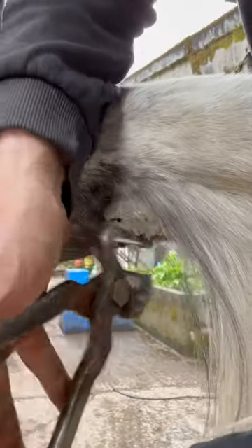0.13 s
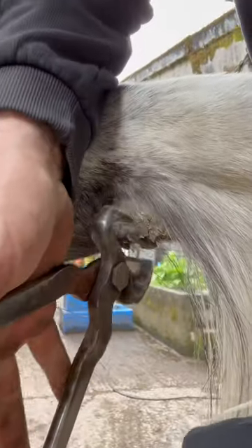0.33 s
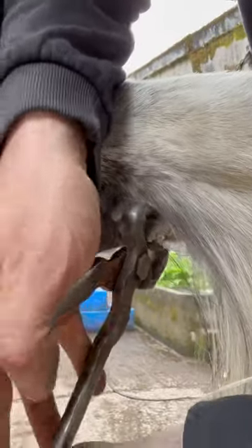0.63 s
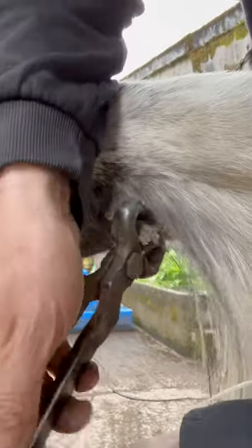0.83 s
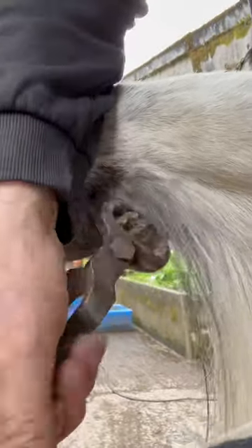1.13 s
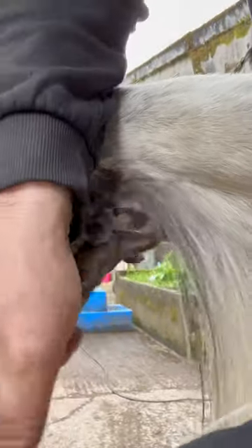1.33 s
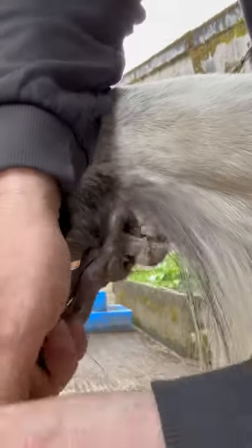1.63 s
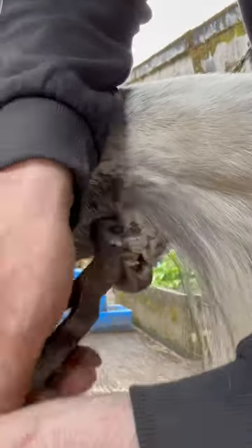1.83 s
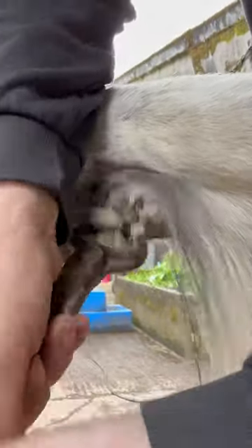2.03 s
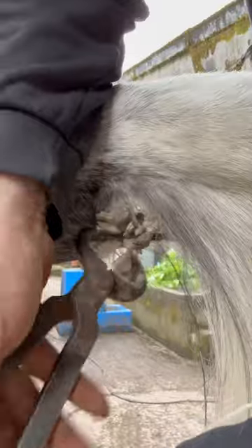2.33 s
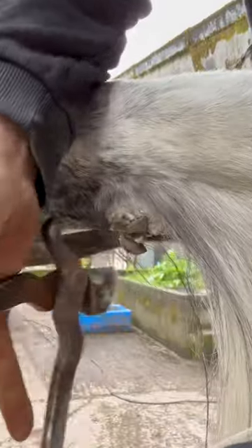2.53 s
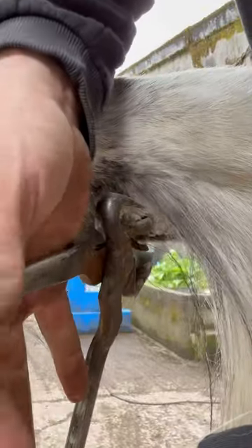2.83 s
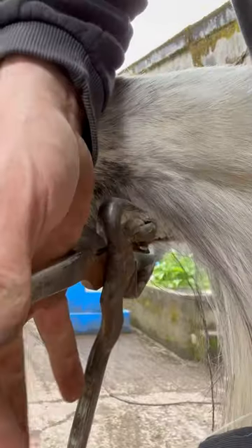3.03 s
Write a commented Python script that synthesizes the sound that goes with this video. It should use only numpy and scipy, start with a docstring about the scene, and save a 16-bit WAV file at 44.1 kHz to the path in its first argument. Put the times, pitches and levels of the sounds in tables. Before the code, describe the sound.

Steel nippers rasp and crunch dry horn very close, already biting at 0 s and fading by 0.2 s. At 0.75 s a harder, ringing burst of cracks ends in a short squeak until 0.85 s. A dull falling tap comes at 1.3 s, light ticks at 1.6-2.25 s, a brittle snap at 2.5 s. Soft handling bumps, strongest near 3.1 s; distant echoing birds, a nearer thin whistle at 2.55-2.95 s, low outdoor rumble and faint hiss.

```python
"""Close to the microphone, steel nippers rasp and crunch through a horny growth on a horse's leg and squeak.
Grains and cracks in noise ring the steel; a dull tap follows as a falling tone, later a sharp snap as brief cracks.
Around the bites the jaws tick as decaying noise, and arms and tool bump as low swells.
Distant birds around the yard are gliding tones with echo, over coloured noise: rumble, drone, air, hiss and rustle."""
import sys
import numpy as np
from scipy import signal
from scipy.fft import rfft, irfft, next_fast_len
from scipy.io import wavfile
from scipy.ndimage import map_coordinates

SR = 44100
rng = np.random.default_rng(int(sys.argv[2]) if len(sys.argv) > 2 else 0)


def dump_mix(stems):
    """Bounce the given channels to the path in sys.argv[1] as a 16-bit WAV at rate SR."""
    frames = np.atleast_2d(stems).T  # one column per channel
    limited = np.clip(frames, -1, 1)  # hard clip at full scale
    pcm = np.round(limited * 32767).astype(np.int16)
    wavfile.write(sys.argv[1], SR, pcm)


N = 140238
BIRD_T60_S = 0.52  # echo decay shared by all the birds that have one


def amp(db):
    """Decibels to gain."""
    return 10 ** (np.asarray(db) / 20)


def unit(x):
    """Scale to rms 1."""
    return x / np.sqrt(np.mean(np.abs(x) ** 2) + 1e-20)


def clock():
    """Time of each sample in seconds."""
    return np.arange(N) / SR


def along(points, hz):
    """Read (Hz, value) points on a log frequency axis."""
    f, v = np.transpose(points)
    return np.interp(np.log(hz + 1), np.log(f + 1), v)


def curves(rows):
    """One value per sample for each column after the time."""
    s, *cols = np.transpose(rows)
    return [np.interp(clock(), s, c) for c in cols]


def wobble(rate):
    """A smooth random curve, rate knots a second."""
    return map_coordinates(rng.standard_normal(8192), [clock() * rate], mode="wrap")


def filtered(x, response):
    """x times a complex response of frequency."""
    m = next_fast_len(N + SR // 4)
    return irfft(rfft(x, m) * response(np.fft.rfftfreq(m, 1 / SR)), m)[..., :N]


def gate(start, length, attack, release):
    """Linear attack, hold and exponential release."""
    t = clock() - start
    return np.clip(t / attack, 0, 1) * np.exp(-np.maximum(t - length, 0) / release)


def sine(hz):
    """A sine that follows a pitch curve."""
    return np.sin(2 * np.pi * np.cumsum(hz) / SR)


def rush(spectrum):
    """Coloured stereo noise of rms 1, its left-right likeness set by frequency."""
    # likeness of left and right: frequency_hz, correlation (0 to 1)
    alike = [(60, 0.98), (220, 1), (380, 0.83), (700, 0), (1300, 0.28), (2400, 0.5), (4400, 0.21),
             (8000, 0), (13000, 0.87)]

    def mid_side(hz):
        turn = np.arccos(np.clip(along(alike, hz), -1, 1)) / 2
        return amp(along(spectrum, hz)) * [np.cos(turn), np.sin(turn)]

    mid, side = filtered(rng.standard_normal((2, N)), mid_side)
    return unit(np.array([mid + side, mid - side]))


def yard(x, t60, width):
    """Diffuse echo of the yard's walls, as decaying stereo noise."""
    t = np.arange(SR) / SR
    mid, side = rng.standard_normal((2, SR)) * amp(-60 * t / t60)
    tail = np.array([mid + width * side, mid - width * side])
    return signal.fftconvolve(x[None], tail / np.linalg.norm(tail[0]), axes=1)[:, :N]


def crunch():
    """Each stroke grinds and cracks through the horn and rings the steel; the blade chatters roughly on one mode."""
    # strokes of the jaws: start_s, length_s, level_db before the body filter,
    # tilt_db_per_octave, chatter_mode_hz, chatter_db
    bites = [(0, .017, -37, -1.5, 4250, -44), (.02, .011, -47, -4, 2310, -56),
             (.036, .016, -54, -5, 2310, -55), (.053, .018, -48.5, -5, 2310, -46),
             (.07, .017, -46, -4, 2310, -52), (.088, .03, -52, -5.5, 2150, -57),
             (.12, .02, -53.5, -4, 2400, -62), (.14, .02, -57, -4, 2400, -64),
             (.16, .03, -62, -3, 2400, -68), (.744, .014, -40, -3, 1290, -45),
             (.757, .006, -36, 0, 1290, -43), (.762, .006, -28.5, 1.5, 5240, -28),
             (.7725, .008, -30, 1, 4090, -35), (.782, .007, -32, -1, 3770, -35),
             (.79, .008, -40, -1, 1530, -50)]
    # ringing of the nippers: frequency_hz, width_hz, relative_level_db
    steel_modes = [(1290, 45, -9), (1510, 50, -9), (2320, 70, -0.5), (2690, 70, -1), (2970, 50, 0),
                   (3170, 45, -3), (3770, 150, -1), (4090, 130, -2), (4780, 170, -2), (5240, 140, 2),
                   (6750, 170, -6), (7380, 70, -6), (8870, 120, -15)]
    # dry crunch of horn: frequency_hz, relative_level_db
    horn = [(500, -34.5), (1100, -27), (2500, 14), (5000, -5), (6100, -7), (7200, -4), (8200, -24),
            (10500, -20), (12500, -21), (15500, -30), (17000, -37.5)]
    # single fractures of the horn: start_s, level_db before the filters
    cracks = [(.0735, -35), (.081, -36), (.745, -30), (.766, -12), (.7768, -12.5), (.7802, -18.5),
              (.7857, -16.5)]
    horn_db, low_hz, high_hz = -14.5, 1000, 12000
    crack_decay_s, crack_low_hz = .0003, 2600
    apart = .12  # share of stereo difference

    def body(f):
        steel = sum(amp(db) * 1j * f * w / (c * c - f * f + 1j * f * w) for c, w, db in steel_modes)
        colour = unit(steel) + amp(horn_db) * unit(amp(along(horn, f)))
        return colour * (1 - np.exp(-(f / low_hz) ** 4)) / (1 + (f / high_hz) ** 4)

    t, rough = clock(), crumbs()
    crack_level = sum((t >= s) * amp(db - 20 * np.abs(t - s) / crack_decay_s / np.log(10)) for s, db in cracks)
    force = rng.standard_normal((2, N)) * crack_level
    force = filtered(force, lambda hz: 1j * hz / (crack_low_hz + 1j * hz))
    chatter = np.zeros(N)
    for start, length, db, tilt, mode_hz, chatter_db in bites:
        stroke = gate(start, length, attack=.003, release=.002) * amp(1.5 * wobble(700))
        grind = filtered(rng.standard_normal((2, N)),
                         lambda hz: amp(tilt * np.log2(np.clip(hz, 1000, 12000) / 4000)))
        force += amp(db) * stroke * rough * grind
        chatter += amp(chatter_db) * stroke * unit(sine(mode_hz * (1 + .012 * wobble(600))))
    mid, side = filtered(force, body)
    return chatter + np.array([mid + apart * side, mid - apart * side])


def crumbs():
    """Roughness of breaking horn: tiny cracks of uneven size over a little steady grinding."""
    per_s, decay_s, spread_db, grind_share = 750, .0005, 4, .2
    sizes = amp(spread_db * np.clip(rng.standard_normal(N), -2, 2))
    hits = (rng.random(N) < per_s / SR) * sizes
    spikes = unit(signal.lfilter([1], [1, -np.exp(-1 / (decay_s * SR))], hits))
    return unit(grind_share + (1 - grind_share) * spikes)


def squeak():
    """The blade sticks and slips at the end of the bite, brightest midway."""
    # pitch and strength of the blade: time_s, pitch_hz, fundamental_rms_db
    blade = [(.78, 2300, -42), (.801, 2335, -34), (.81, 2400, -39), (.821, 2430, -39), (.836, 2370, -35),
             (.843, 2385, -38), (.85, 2420, -56)]
    # harmonics at the brightest moment: multiple, level_db against the fundamental
    overtones = [(2, -3), (3, -8), (4, -22), (5, -25)]
    bright_s, bright_width_s = .818, .016
    t = clock()
    hz, db = curves(blade)
    phase = 2 * np.pi * np.cumsum(hz * (1 + .007 * wobble(550))) / SR
    bright = np.exp(-((t - bright_s) / bright_width_s) ** 2)
    harmonics = sum(amp(level) * np.sin(round(k) * phase) for k, level in overtones)
    sounding = (t > blade[0][0]) * (t < blade[-1][0])
    return np.sqrt(2) * amp(db) * (np.sin(phase) + bright * harmonics) * sounding


def tap():
    """A dull tap whose pitch drops within milliseconds into a softer body."""
    start_s, t60_s, start_db = 1.3083, .05, -30.5
    high_hz, low_hz, fall_s = 1940, 204, 0.00244
    body_db, ring_s = -7, .003  # the body settles this far down, this quickly
    t = np.maximum(clock() - start_s, 0)
    cycles = low_hz * t + (high_hz - low_hz) * fall_s * (1 - np.exp(-t / fall_s))
    db = start_db + body_db * (1 - np.exp(-t / ring_s)) - 60 * t / t60_s
    return filtered(amp(db) * np.sin(2 * np.pi * cycles), lambda hz: 1 / (1 + (hz / 2300) ** 8))


def snap():
    """A brittle chip breaks off in a quick run of cracks, each with a very high, short ring."""
    # cracks of the last chip: start_s, level_db before the noise and ring shares
    chip = [(2.5227, -22), (2.5234, -30), (2.5239, -35)]
    # colour of the cracks: frequency_hz, relative_level_db
    colour = [(400, -11), (2000, -7), (6500, -8), (9500, -10.5), (13000, 4), (15000, -4), (17000, 1)]
    t60_s, ring_hz = .002, 13700
    t = clock()
    level = sum((t >= s) * amp(db - 60 * np.abs(t - s) / t60_s) for s, db in chip)
    return level * (amp(-4) * rush(colour) + amp(-5) * np.sin(2 * np.pi * ring_hz * t))


def ticks():
    """The jaws touch and scuff the horn while they seek a new grip; one short scrape rises before the bite."""
    # light touches, as noise: start_s, starting_rms_db, t60_s
    touches = [(0.704, -65, 0.074), (1.603, -55.5, .05), (1.676, -59, 0.013), (1.932, -55.5, 0.022),
               (2.025, -50, 0.0088), (2.057, -54, 0.02), (2.069, -52, 0.01), (2.241, -55, .03),
               (3.045, -63, 0.064)]
    # colour of the touches: frequency_hz, relative_level_db
    colour = [(1000, -20), (2500, -4), (3700, 9), (5500, 1), (8000, -31.5), (11000, -8), (15500, -15),
              (17000, -32)]
    t = clock()
    scrape = amp(-60) * note(.695, .02, 3000, 3850, .024 * wobble(600))
    return scrape + rush(colour) * sum((t >= s) * amp(db - 60 * np.abs(t - s) / t60) for s, db, t60 in touches)


def bumps():
    """Soft low swells from the moving arms and tool."""
    # handling: centre_s, pitch_hz, peak_db, half_width_s (to 1/e)
    swells = [(.09, 96.9, -36.5, 0.037), (0.168, 203.3, -37.5, 0.032), (.18, 53.1, -41, 0.11),
              (0.604, 60.6, -34, 0.016), (0.898, 222.2, -35, 0.02), (1.21, 92.4, -36.5, 0.013),
              (1.224, 224.8, -39.5, 0.021), (2.598, 62.6, -40, 0.017), (2.809, 66, -38, 0.015),
              (3.097, 68.5, -30, 0.018), (3.148, 69.7, -31.5, 0.0097)]
    t = clock()
    return sum(amp(db) * np.exp(-((t - s) / width) ** 2) * np.sin(2 * np.pi * (hz * t + rng.random()))
               for s, hz, db, width in swells)


def note(start, length, from_hz, to_hz, waver, ratio=1):
    """One gliding, wavering tone with a quick attack and release."""
    hz = ratio * np.interp(clock(), [start, start + length], [from_hz, to_hz]) * (1 + waver)
    return gate(start, length, attack=0.0036, release=0.011) * sine(hz)


def thin_whistle():
    """A nearer, thin whistle drops, then holds in pulses, with little echo."""
    # the whistle: time_s, pitch_hz, level_db before flutter and trim
    call = [(2.545, 2720, -75), (2.558, 2620, -56), (2.566, 2410, -49), (2.59, 2320, -57),
            (2.63, 2280, -48), (2.658, 2255, -59), (2.668, 2250, -50), (2.685, 2245, -68),
            (2.71, 2230, -66), (2.722, 2222, -50), (2.758, 2222, -49), (2.785, 2230, -68),
            (2.815, 2255, -53), (2.865, 2240, -66), (2.9, 2260, -57), (2.945, 2250, -75)]
    trim_db, flutter_db, echo_db = -.5, 3, -6
    t = clock()
    hz, db = curves(call)
    tone = sine(hz * (1 + .012 * wobble(330)))
    tone = tone * amp(db + trim_db + flutter_db * wobble(110)) * (t > call[0][0]) * (t < call[-1][0])
    return np.sqrt(2) * tone + amp(echo_db) * yard(tone, BIRD_T60_S, width=0.67)


def birds():
    """Far fluttering whistles and raspy two-voiced chirps, heard mostly by their echo, and one high dry peep."""
    # far whistles: start_s, length_s, from_hz, to_hz, level_db before flutter and direct share
    far_whistles = [(0.262, 0.04, 1880, 1806, -65), (0.584, 0.1, 1897, 1808, -57.5),
                    (0.829, 0.032, 2440, 2430, -51.5), (0.955, 0.072, 2420, 2396, -56),
                    (1.091, 0.18, 2394, 2274, -62), (1.101, 0.28, 1930, 1913, -63),
                    (1.251, 0.17, 2297, 2040, -60.5), (1.454, 0.15, 2068, 2186, -63.5),
                    (1.68, 0.027, 1880, 2020, -59), (1.814, 0.066, 2018, 2054, -49),
                    (1.991, 0.088, 2395, 2356, -60), (2.008, 0.28, 2075, 2112, -63.5),
                    (2.11, 0.16, 2406, 2735, -64), (2.279, 0.15, 2860, 2750, -67.5),
                    (2.991, 0.079, 2230, 1843, -62.5), (3.065, 0.057, 2680, 2940, -66.5)]
    # far chirps: start_s, length_s, from_hz, to_hz, level_db before direct share, upper_voice_db against the lower
    far_chirps = [(0.088, 0.1, 4540, 4340, -64, -10), (0.297, 0.06, 4630, 4220, -50.5, -17),
                  (0.373, 0.079, 4323, 4290, -58, -25), (0.504, 0.069, 4776, 4520, -57, -20),
                  (0.648, 0.035, 4540, 4296, -54, -8.5), (1.264, 0.033, 4360, 4267, -54, -6.5),
                  (1.418, 0.092, 4670, 4557, -57, -19.5), (1.635, 0.041, 5000, 4480, -57, -18),
                  (1.692, 0.075, 4340, 4410, -61.5, -3.5), (1.856, 0.094, 4750, 4490, -60, -9.5),
                  (2.175, 0.052, 4480, 4313, -56, -5), (2.453, 0.1, 4605, 4435, -61.5, -10.5),
                  (2.816, 0.098, 4344, 4290, -58, -7), (3.06, 0.037, 4565, 4360, -51, -9)]
    # rasp in the chirps: frequency_hz, relative_level_db
    rasp = [(2500, -36), (3400, -11), (4400, 10), (5200, 1), (6500, -1), (7000, -9), (7400, -41)]
    direct, rasp_db, upper_ratio = 0.63, -13, 1.455
    flutter_db, flutter_per_s = 5.5, 71
    peep_s, peep_width_s, peep_hz, peep_db = 2.367, 0.01, 7300, -54
    fast = .021 * wobble(450)
    whistles = sum(amp(db) * note(s, length, a, b, .025 * wobble(330)) for s, length, a, b, db in far_whistles)
    whistles = whistles * amp(flutter_db * wobble(flutter_per_s))
    chirps = np.zeros(N)
    for s, length, a, b, db, upper_db in far_chirps:
        lower = note(s, length, a, b, fast)
        upper = note(s, length, a, b, fast, upper_ratio)
        chirps += amp(db) * (lower + amp(upper_db) * upper)
    chirps = chirps + amp(rasp_db) * np.abs(chirps) * rush(rasp)[0]
    peep_shape = np.exp(-((clock() - peep_s) / peep_width_s) ** 2)
    peep = amp(peep_db) * peep_shape * sine(peep_hz * (1 + fast / 2))
    echo = yard(whistles, BIRD_T60_S, width=0.43) + yard(chirps, BIRD_T60_S, width=0.99)
    return direct * (whistles + chirps) + peep + echo


def background():
    """Low rumble, a drone, open air, a swelling hiss and the faint rustle of hair and sleeve, all coloured noise."""
    # five colours of noise: frequency_hz, relative_level_db
    rumble, drone, air = [(15, -32), (25, -13), (40, -10), (62, 1), (100, -0.5), (150, -10.5), (200, -10),
                          (370, -77.5)], [(110, -21), (160, -11.5), (200, 5), (235, 5.5), (285, 3),
                                          (340, -8), (450, -17.5), (800, -82)], [(200, -3), (450, 5), (900, 3.5), (1600, -5),
                                                         (2200, 3), (2800, -6.5), (3300, -16.5), (4600, -5),
                                                         (5600, -26), (6800, -18), (7300, -56.5),
                                                         (16000, -42)]
    hiss, hair = [(2300, -9.5), (3000, -3.5), (3800, -1), (4600, 4), (5500, -1.5), (6700, -2.5),
                  (7200, -38), (9000, -41)], [(7000, -55), (9000, -19), (10500, -3), (12500, -2.5), (15500, 2),
                                (16200, -27)]
    # low end before a common lift: time_s, rumble_db, drone_db
    low_levels = [(0.0, -39.5, -45), (0.08, -45, -46), (1.05, -48, -45), (2.28, -49.5, -53.5),
                  (3.06, -45.5, -50.5), (3.09, -34, -50), (3.18, -45, -49)]
    # hair and sleeve before the flicker: time_s, level_db
    rustle_levels = [(0, -90), (.08, -60), (.22, -98), (.5, -93), (.62, -78.5), (.7, -86), (.88, -69.5),
                     (.98, -87), (1.19, -64.5), (1.3, -80.5), (1.56, -82.5), (1.61, -81), (1.71, -93),
                     (1.82, -65.5), (1.87, -87), (1.94, -64.5), (2, -71), (2.04, -77), (2.14, -93),
                     (2.24, -62), (2.275, -73), (2.32, -72), (2.42, -86.5), (2.75, -79), (2.95, -96)]
    # treble hiss before the flicker: time_s, level_db
    hiss_levels = [(0, -49), (.25, -67.5), (.5, -72.5), (.67, -63.5), (.85, -62.5), (1.0, -70),
                   (1.13, -68.5), (1.25, -62.5), (1.52, -67.5), (1.74, -62), (2.12, -72.5), (2.23, -58.5),
                   (2.4, -70), (2.62, -66.5), (2.82, -58), (2.99, -72), (3.07, -60.5), (3.18, -69)]
    lift_db, air_db = 0.5, -57.5
    rumble_db, drone_db = curves(low_levels)
    rustle_db, = curves(rustle_levels)
    hiss_db, = curves(hiss_levels)
    low = amp(rumble_db + lift_db) * rush(rumble) + amp(drone_db + lift_db) * rush(drone)
    high = amp(hiss_db + 1.5 * wobble(60)) * rush(hiss) + amp(rustle_db + 2.0 * wobble(300)) * rush(hair)
    return low + high + amp(air_db + wobble(4.97)) * rush(air)


def scene():
    """The close nippers in front of the yard."""
    # phase between the microphone ports: frequency_hz, left_lead_rad
    port_phase = [(1950, 0), (2200, .8), (2450, 3.1), (2900, 4.2), (3700, 5.8), (4800, 5.8), (5200, 4.5),
                  (7000, 4), (8000, 3.1), (10400, 2.8), (11700, 0)]
    pan_db, echo_db = .25, -11.5
    jaws = crunch() + squeak()
    sides = np.array([[1], [-1]])  # left, right
    near = amp(pan_db * sides) * filtered(jaws, lambda hz: np.exp(.5j * sides * along(port_phase, hz)))
    echo = amp(echo_db) * yard(jaws[0], t60=0.1, width=1.0)
    handling = tap() + snap() + ticks() + bumps()
    return near + echo + handling + thin_whistle() + birds() + background()


def record(dry):
    """A steep low-pass at 16 kHz limits the band."""
    return filtered(dry, lambda hz: 1 / np.sqrt(1 + (hz / 16000) ** 120))


dry = scene()
out = record(dry)
dump_mix(out)
```